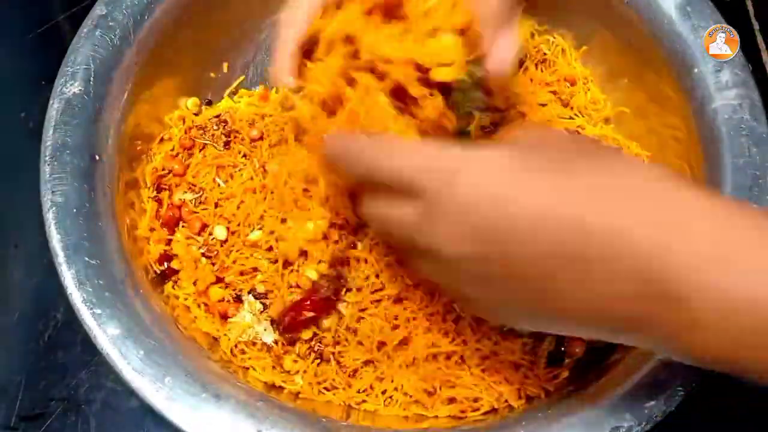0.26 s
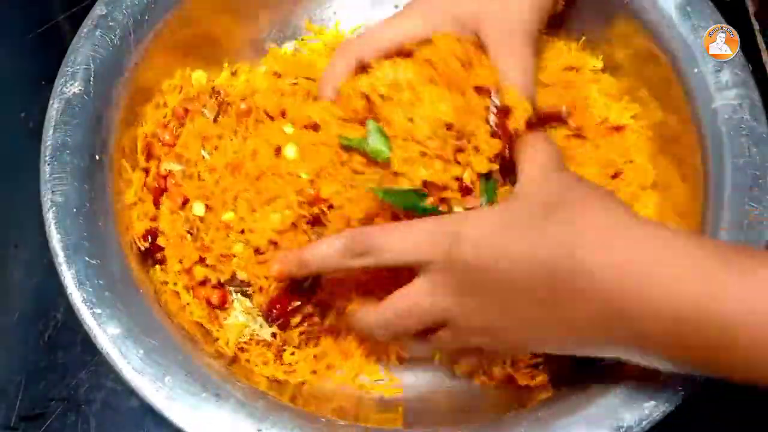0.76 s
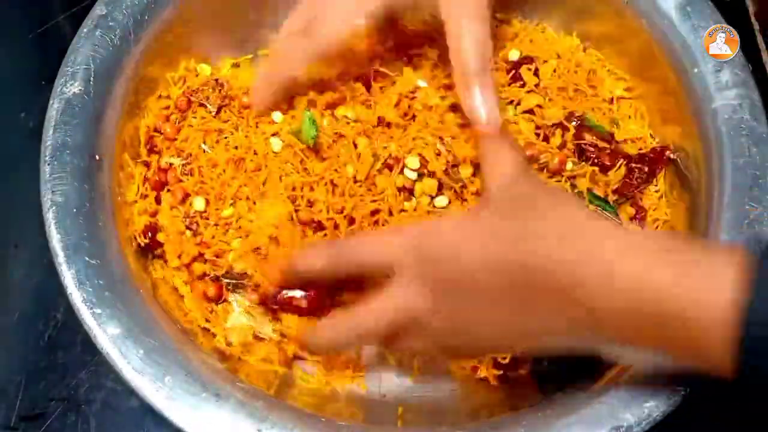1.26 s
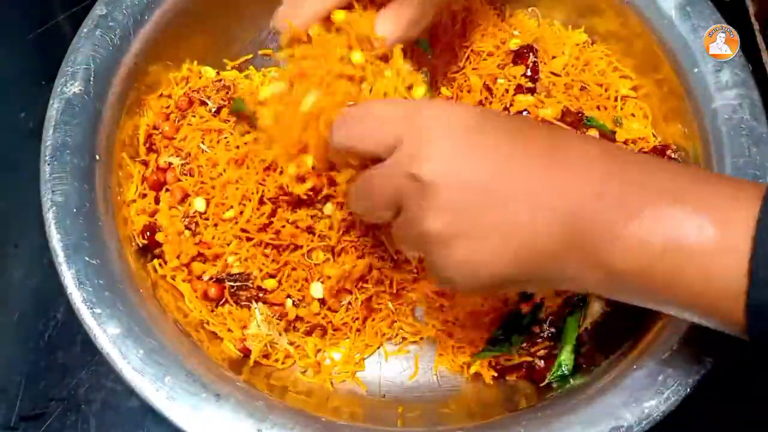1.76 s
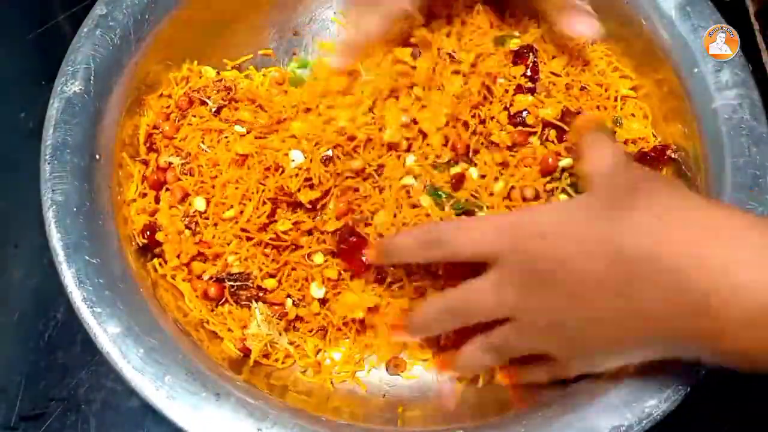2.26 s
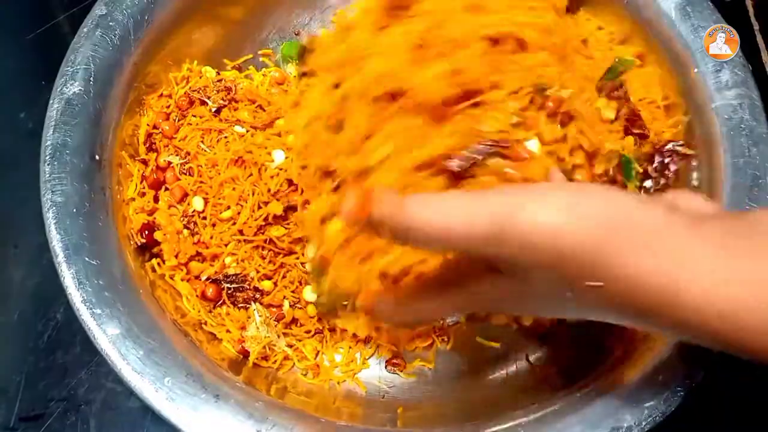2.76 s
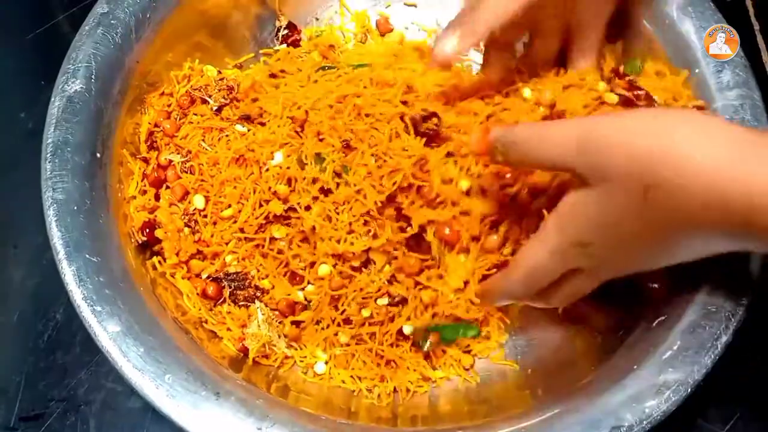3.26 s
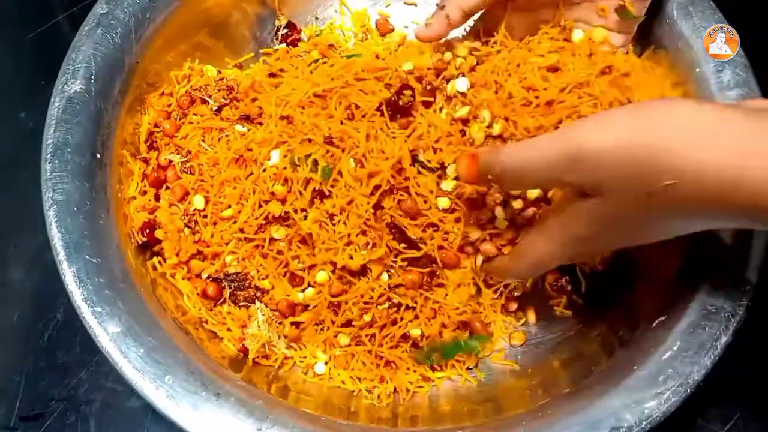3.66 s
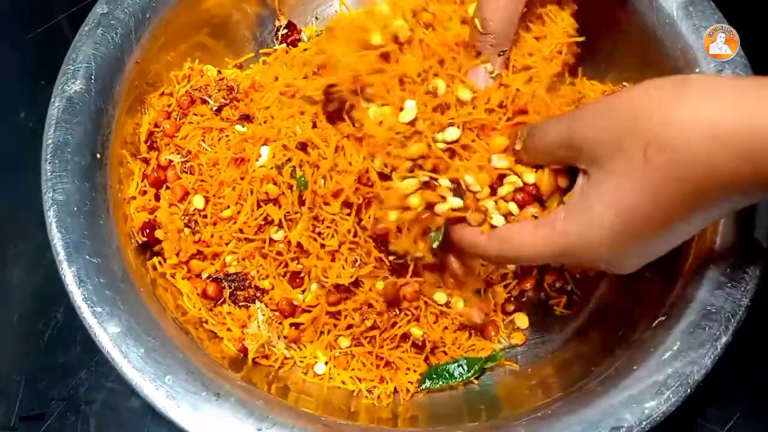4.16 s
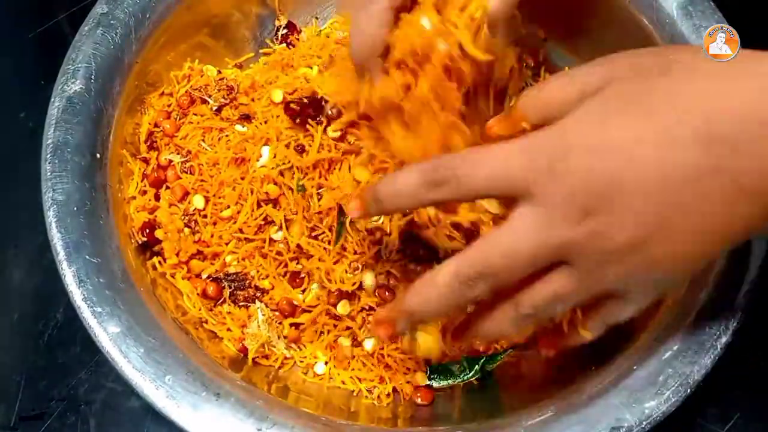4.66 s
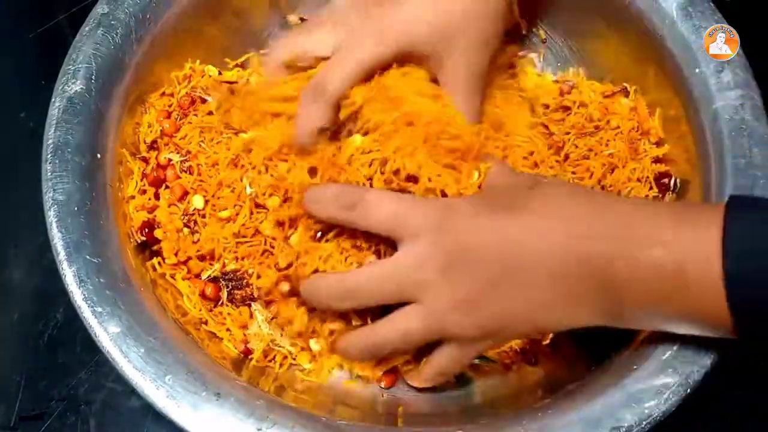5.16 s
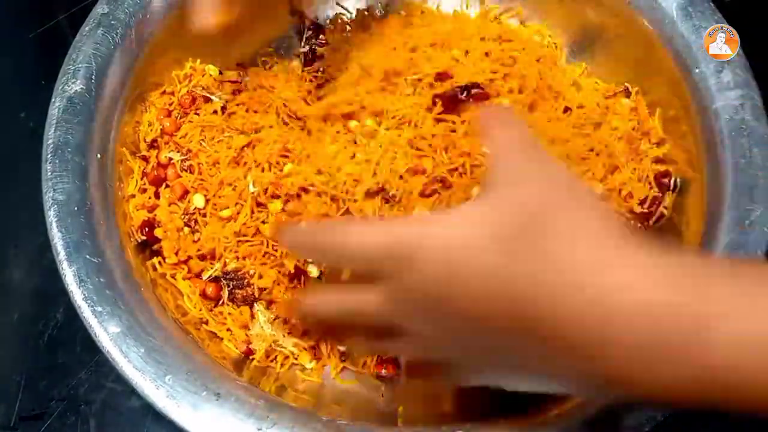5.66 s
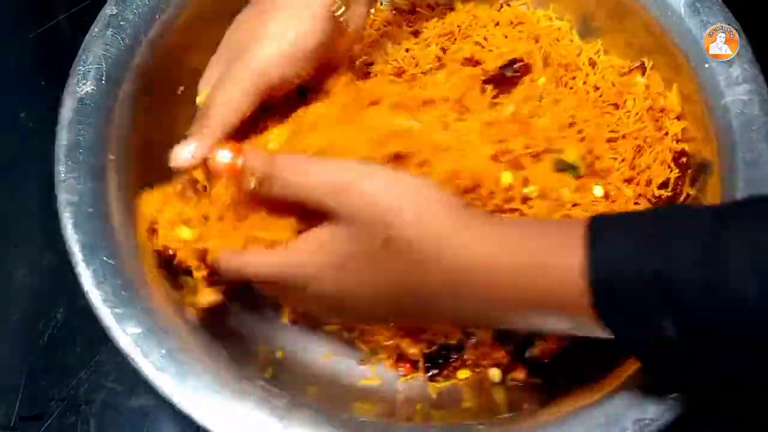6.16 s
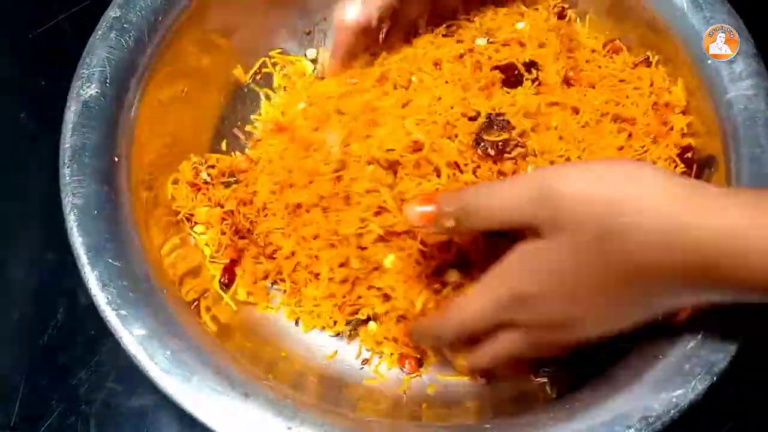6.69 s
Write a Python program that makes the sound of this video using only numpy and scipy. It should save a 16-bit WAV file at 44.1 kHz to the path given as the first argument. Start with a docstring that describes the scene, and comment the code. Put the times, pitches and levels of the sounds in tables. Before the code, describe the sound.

From the start, hands toss dry fried noodles, nuts and lentils in a wide steel bowl, close to the microphone. Countless brittle pieces click together in a crisp rustle that swells unevenly with each grab and sweep, while the sliding heap adds a hollow, low rumble from the bowl on the counter. Single strands snap and nuts drop throughout, with a dense rattle around 1.5 to 1.8 seconds. The sharp clicks are thickest from about 2.6 to 4.2 seconds. A few dull knocks on the bowl's floor fall between 3 and 5.3 seconds, the first the clearest. At about 5.3 seconds, pieces briefly scrape bare steel and a finger squeaks faintly. A second scrape at 6.2 seconds leads into two flung handfuls around 6.5 and 6.6 seconds, each cracking against the wall with a short metallic ring. A few last nuts drop amid the rustling just before 7 seconds.

```python
"""Two hands toss dry fried noodles, nuts and lentils in a wide steel bowl, close to a two-port microphone.
Fingers dig in, thousands of brittle pieces click together, and the sliding heap rumbles the bowl on the
counter. Snapping strands and dropping nuts stand out, thickest midway, joined by dull knocks on the floor
of the bowl. After five seconds pieces scrape bare steel and a finger squeaks. Near the end a second scrape
leads into two flung handfuls that ring the wall, and a few last nuts drop."""
import sys
import numpy as np
from scipy import signal
from scipy.fft import rfft, irfft
from scipy.io import wavfile

SR = 44100
rng = np.random.default_rng(int(sys.argv[2]) if len(sys.argv) > 2 else 0)


def transcribe(u):
    """Save the signal u as a 16-bit wav file named by the first command-line argument.

    u: samples, shape (n,) or (channels, n), limited to [-1, 1]; the rate is SR.
    q: integer samples, one column per channel.
    """
    v = np.clip(np.atleast_2d(u).T, -1, 1)
    q = np.round(v * 32767).astype(np.int16)
    wavfile.write(sys.argv[1], SR, q)


N = 305613
T = np.arange(N) / SR

# The crisp colour of the noodle strands. Each row: frequency in Hz, level in dB.
STRAND_COLOUR = [(1760, -30), (3000, 0), (3420, -2.5), (3980, 1), (4950, -3), (6080, -3.5), (8500, -23.5),
                 (11000, -51.5), (18700, -120)]
# The bright fizz of the crumbs. Each row: frequency in Hz, level in dB.
CRUMB_COLOUR = [(4120, -20.5), (7000, 1), (9810, -9.5), (12600, -6), (13600, -7), (15000, -0.5),
                (15800, -40)]
# The colour that the air in the bowl gives the nuts. Each row: frequency in Hz, level in dB.
NUT_COLOUR = [(1000, -33.5), (1500, -14.5), (1900, -6), (2300, -1.5), (2650, 0), (3000, -1.5), (3600, -17),
              (6000, -51.5)]


def heap(gains):
    """Clumped clicks over a blur of countless smaller ones: strands, nuts, crumbs, body and rumble."""
    # Narrow rings of the air in the bowl. Each row: pitch in Hz, width in Hz, level in dB.
    air_modes = [(2300, 47, -8.5), (2465, 36, 3.5), (2690, 52, 3.5)]
    # The hollow body of the bowl. Each row: frequency in Hz, level in dB.
    hollow_colour = [(100, -46.5), (170, -9), (307, -6.5), (598, -7.5), (724, -1.5), (860, -3.5),
                     (969, 3.5), (1330, -11), (1500, -6.5), (1950, -24), (3300, -120)]
    grains = clicks(per_s=2500, spread_db=2.88, t60=0.053, q=3.27, broad=0.16)
    breaks = clicks(per_s=220, spread_db=3.8, t60=0.015, q=1.1, broad=0.59, pitches=5)  # single strands
    taps = clicks(per_s=90, spread_db=3.7, t60=0.016, q=2.0, broad=1.6, pitches=4)  # single nuts landing
    strands = colour((0.54 * breaks + grains + 0.43 * stereo_noise(0.028)) * flutter(12.4, 1.78),
                     STRAND_COLOUR)
    nuts = colour((0.4 * taps + grains + 0.49 * stereo_noise(0.43)) * flutter(9.5, 1.78), NUT_COLOUR)
    air_ring = sum(amp(db) * resonate(nuts, hz, width) for hz, width, db in air_modes)
    nuts = unit_rms(nuts) + amp(-12) * unit_rms(air_ring)
    crumbs = colour((0.3 * breaks + grains + 1.1 * stereo_noise(0.1)) * flutter(11, 2.4), CRUMB_COLOUR)
    hollow = colour((0.55 * grains + stereo_noise(0.8)) * flutter(9, 2.2), hollow_colour)
    layers = (strands, nuts, crumbs, hollow, rumble())
    return sum(gain * unit_rms(layer) for gain, layer in zip(gains, layers))


def hands():
    """The hands ride the gains of the heap's five layers; overlapping gestures add in power."""
    # The heap settling. In order: levels in dB of strands, nuts, crumbs, hollow body and rumble.
    settling = (-42, -41, -53, -51, -55)
    # Fingers digging in. Each row: peak time, rise and fall in seconds, then strands, nuts, crumbs in dB.
    grabs = [(0.15, 0.21, 0.02, -45, -28.5, -39), (0.452, 0.013, 0.07, -22, -23.5, -49),
             (0.79, 0.12, 0.18, -24, -28, -32), (0.92, 0.084, 0.35, -22.5, -28.5, -33.5),
             (1.56, 0.14, 0.11, -19, -20.5, -28.5), (1.66, 0.04, 0.32, -25, -18.5, -35),
             (2.05, 0.96, 0.56, -28.5, -31.5, -35.5), (2.3, 0.1, 0.27, -29.5, -29.5, -35),
             (2.711, 0.037, 0.69, -21.5, -23, -35), (3.25, 0.26, 0.23, -28.5, -24, -39),
             (3.5, 0.21, 0.45, -26, -27.5, -35), (3.87, 0.016, 0.44, -32.5, -24, -38),
             (4.08, 0.39, 0.19, -27, -67, -57), (4.7, 0.09, 0.083, -28, -38, -38),
             (4.95, 0.74, 0.51, -28, -33, -42), (5.14, 0.07, 1.9, -28.5, -30.5, -40.5),
             (5.958, 0.16, 1.4, -24, -29, -33), (6.52, 0.16, 0.37, -18, -16, -34),
             (6.83, 0.4, 0.47, -25.5, -39, -34)]
    # The heap sliding over the steel. Each row: peak time, rise and fall in seconds,
    # then strands, nuts, hollow body and rumble in dB.
    sweeps = [(0.33, 0.44, 0.27, -25, -25, -31.5, -37.5), (1.06, 0.26, 0.21, -27.5, -19.5, -31, -38),
              (1.821, 0.16, 0.15, -27.5, -22, -28, -31), (2.84, 0.23, 0.36, -44, -22.5, -34.5, -42.5),
              (3.64, 0.34, 0.12, -23.5, -19.5, -39.5, -43.5), (5.548, 0.22, 0.23, -22.5, -19, -28, -34.5),
              (6.285, 0.14, 0.19, -21.5, -20.5, -34, -31)]
    power = amp(settling)[:, None] ** 2 * np.ones(N)
    for peak, rise, fall, strands, nuts, crumbs in grabs:
        hollow = (strands + nuts) / 2 - 15
        swell_db = gesture(peak, rise, fall, rise_bend=0.91, fall_bend=0.9)  # peaks sharply
        power[:4] += amp(np.c_[[strands, nuts, crumbs, hollow]] + swell_db) ** 2
    for peak, rise, fall, strands, nuts, hollow, rocking in sweeps:
        crumbs = strands - 11
        swell_db = gesture(peak, rise, fall, rise_bend=1.1, fall_bend=1.55)  # holds, then stops short
        power += amp(np.c_[[strands, nuts, crumbs, hollow, rocking]] + swell_db) ** 2
    return np.sqrt(power)


def gesture(peak, rise, fall, rise_bend, fall_bend):
    """One hand move in dB: it swells from -15 to 0 over the rise and sinks back over the fall."""
    away = abs(T - peak)
    return -15 * np.where(T < peak, (away / rise) ** rise_bend, (away / fall) ** fall_bend)


def snaps():
    """A nut drops or a strand snaps: a few milliseconds of crack, then a weaker scatter in the bowl."""
    # Each row: start in seconds, peak level in dB, pitch in Hz.
    pieces = [(0.17, -12.5, 6100), (0.191, -14.5, 5830), (0.3492, -9, 3900), (0.4615, -9.5, 3920),
              (0.6315, -8.5, 4220), (0.814, -18, 2340), (0.835, -7.5, 2330), (0.863, -21, 2520),
              (2.0362, -11, 5660), (2.155, -20, 2300), (2.238, -24, 2400), (2.2583, -26, 4640),
              (2.61, -19.5, 2600), (2.641, -26, 4350), (2.6716, -12.5, 2610), (2.6962, -9, 2620),
              (2.7822, -3.5, 2300), (2.8885, -24, 2580), (3.0526, -14, 2360), (3.109, -11.5, 2960),
              (3.211, -33, 2780), (3.2286, -6, 2530), (3.2817, -4.5, 2520), (3.4105, -24, 2540),
              (3.4677, -11, 2720), (3.484, -6.5, 2300), (3.507, -6, 2440), (3.5167, -5.5, 2370),
              (3.5253, -10, 3900), (3.753, -11, 2690), (3.8258, -5, 2600), (3.852, -2, 2590),
              (3.8896, -11.5, 2610), (3.9934, -12.5, 2630), (4.0617, -4, 2530), (4.1135, -15, 2650),
              (4.1563, -12, 2590), (4.1878, -23.5, 2580), (4.2263, -18, 2580), (4.389, -16, 2580),
              (4.475, -28, 2230), (4.681, -17, 2560), (4.7232, -17.5, 2600), (4.8728, -16, 2130),
              (4.894, -18.5, 4450), (4.9347, -29, 3670), (4.963, -20, 2930), (5.0459, -18, 2260),
              (5.093, -15, 4200), (5.1186, -12.5, 4940), (5.218, -19, 6400), (5.389, -13.5, 2740),
              (5.658, -17, 4100), (5.694, -11, 2650), (5.773, -13, 2800), (5.882, -18, 3700),
              (5.948, -13, 6150), (6.019, -15, 2700), (6.0651, -9, 2610), (6.096, -6.5, 5650),
              (6.7706, -11.5, 2550), (6.839, -9.5, 2620), (6.877, -12.5, 2670)]
    out, t = np.zeros((2, N)), np.arange(3000) / SR
    envelope = (decay(t, 0.011) + amp(-15.5) * decay(t, 0.1)) * np.minimum(t / 0.0006, 1)
    for start, db, hz in pieces:
        edge_db = -19.5 + 10.5 * np.log2(hz / 2600)  # smaller, higher pieces are brighter
        crack = burst(hz, envelope, width_hz=430 * hz / 2600, crack_db=-12.5, edge_db=edge_db)
        add(out, start, amp(db) * crack / abs(crack.mean(0)).max())
    return out


def nut_clusters():
    """Several nuts land at once in a short, dense rattle."""
    # Each row: start in seconds, peak level in dB, pitch in Hz, hold in seconds.
    landings = [(0.28, -15.5, 2400, 0.025), (0.98, -11.5, 2530, 0.024), (1.529, -6, 2380, 0.0061),
                (1.556, -4.5, 2675, 0.017), (1.603, -12, 2620, 0.015), (1.638, -13, 2700, 0.028),
                (1.806, -10.5, 2660, 0.018), (2.596, -21, 2514, 0.007), (4.688, -22, 2540, 0.013)]
    out, t = np.zeros((2, N)), np.arange(3000) / SR
    for start, db, hz, hold in landings:
        envelope = decay(t - hold, 0.058) * np.minimum(t / 0.0038, 1)
        rattle = burst(hz, envelope, width_hz=340, crack_db=-12.5, edge_db=-20.5)
        add(out, start, amp(db) * rattle / abs(rattle.mean(0)).max())
    return out


def flings():
    """A handful strikes the wall: a long crack that also rings the steel."""
    # Each row: start in seconds, crack level in dB, pitch in Hz, hold and 60 dB decay in seconds,
    # spot struck on the wall, which sets which steel tones ring loudest.
    handfuls = [(6.486, -12.5, 2800, 0.031, 0.18, 0.1), (6.61, -10, 4400, 0.0036, 0.095, 0.5)]
    out, t = np.zeros((2, N)), np.arange(SR // 3) / SR
    for start, db, hz, hold, t60, spot in handfuls:
        envelope = decay(t - hold, t60) * np.minimum(t / 0.0029, 1)
        crack = burst(hz, envelope, width_hz=540, crack_db=-4, edge_db=-26)
        ring = unit_rms(steel_wall(rng.standard_normal((2, len(t))) * envelope, spot))
        attack_rms = np.sqrt(np.mean(crack[:, :SR // 50] ** 2))
        add(out, start, amp(db) * (crack + amp(2.5) * ring) / attack_rms)
    return out


def scrapes(strand_gain):
    """Rough contact keeps the wall ringing: faintly under all stirring, clearly where steel is bare."""
    # Pieces dragged along bare steel. Each row: start and end in seconds, level in dB.
    drags = [(5.233, 5.412, -24.5), (6.178, 6.482, -24)]
    bare = sum(amp(db) * gate(start, end, fade=0.055) for start, end, db in drags)
    slide = sum(0.73 * (T - start) * (start < T) * (T < end) for start, end, _ in drags)
    spot = (0.11 + slide) * flutter(12, 6.3)  # the contact wanders, so the modes come and go
    friction = stereo_noise(0.11) * flutter(37, 1.8)
    return (bare + amp(-20.5) * strand_gain) * unit_rms(steel_wall(friction, spot))


def steel_wall(drive, spot):
    """The wall of the bowl rings; the spot of contact favours some modes over their neighbours."""
    # Each row: pitch in Hz, width in Hz, level in dB.
    modes = [(735, 23, -5), (976, 42, -9), (1136, 12, -4.5), (1604, 14, 4), (2230, 43, 4.5),
             (3160, 28, -0.5), (3400, 22, 2), (3900, 33, 5), (4220, 37, -0.5), (4560, 5.7, 5.5),
             (5290, 20, 4.5), (5950, 30, 0)]
    reach = 0.12 + np.cos(np.pi * (np.arange(len(modes))[:, None] / 4 - spot)) ** 2
    return sum(gain * amp(db) * resonate(drive, hz, width) for gain, (hz, width, db) in zip(reach, modes))


def knocks():
    """Knuckles and nuts hit the floor of the bowl: a tick and a dull, rough ring, alike at both ports."""
    # Each row: start in seconds, peak level in dB, pitch in Hz.
    blows = [(3.064, -16, 950), (3.669, -29, 704), (3.868, -21, 560), (4.722, -31.5, 1000),
             (5.332, -25, 790)]
    out, t = np.zeros((2, N)), np.arange(3000) / SR
    envelope = decay(t, 0.055) + amp(-3) * decay(t, 0.16)
    for start, db, hz in blows:
        centre, side = rng.standard_normal((2, len(t))) * envelope
        blow = np.array([centre, centre + 0.68 * side])
        ring = unit_rms(resonate(resonate(blow, hz, 210), hz, 570))
        knock = ring + amp(-13) * unit_rms(colour(blow, NUT_COLOUR))
        add(out, start, amp(db) * knock / abs(knock).max())
    return out


def squeak():
    """A finger squeaks on the steel: an unsteady tone that rises a little."""
    # In order: start and end in seconds, first and last pitch in Hz, level in dB.
    start, end, first_hz, last_hz, db = (5.265, 5.375, 742, 770, -39)
    pitch = np.interp(T, [start, end], [first_hz, last_hz]) * flutter(25, 0.06)
    tone = np.sqrt(2) * np.sin(2 * np.pi * np.cumsum(pitch) / SR)
    return amp(db) * gate(start, end, fade=0.0091) * flutter(25, 3.8) * tone


def rumble():
    """The sliding heap rocks the bowl on the counter."""
    # Each row: pitch in Hz, width in Hz, level in dB.
    modes = [(83.8, 20, -3.5), (98.7, 21.7, -4), (138, 7.5, -1.5)]
    push = stereo_noise(0.99) * flutter(14, 2.9)
    return sum(amp(db) * resonate(resonate(push, hz, width), hz, 2 * width) for hz, width, db in modes)


def clicks(per_s, spread_db, t60, q, broad, pitches=14):
    """Pieces of many pitches collide at random; each click scatters differently towards each port."""
    hits = amp(spread_db * np.minimum(rng.exponential(1, N), 5)) * (rng.random(N) < per_s / SR)
    piece = rng.integers(0, pitches, N)
    out, t = np.zeros((2, N)), np.arange(1200) / SR
    for k, hz in enumerate(np.geomspace(500, 15000, pitches)):
        scatter = rng.standard_normal((2, len(t))) * decay(t, t60)
        grain = broad * scatter + resonate(resonate(scatter, hz, hz / q), hz, hz / q)
        out += signal.oaconvolve((hits * (piece == k))[None], grain, axes=1)[:, :N]
    return unit_rms(out)


def burst(hz, envelope, width_hz, crack_db, edge_db):
    """A puff of impacts led by one hard tick: the pitch of the piece, a broad crack and a bright edge."""
    puff = rng.standard_normal((2, len(envelope))) * envelope
    puff[:, 0] = 1.5  # the tick
    pitched = unit_rms(resonate(resonate(puff, hz, width_hz), hz, 2 * width_hz))
    crack = amp(crack_db) * unit_rms(colour(puff, STRAND_COLOUR))
    edge = amp(edge_db) * unit_rms(colour(puff, CRUMB_COLOUR))
    return pitched + crack + edge


def colour(x, points):
    """Causal EQ with the given curve, so that clicks keep their sharp attack."""
    curve_db = read_curve(points, abs(np.fft.fftfreq(4096, 1 / SR)))
    log_gain = np.log(amp(np.maximum(curve_db, -80)))
    minimum_phase = np.exp(np.conj(signal.hilbert(log_gain)))
    taps = np.fft.ifft(minimum_phase).real[:2048]
    return signal.oaconvolve(x, taps[None], axes=1)[:, :x.shape[1]]


def resonate(x, hz, width_hz):
    """A two-pole resonance."""
    r = np.exp(-np.pi * width_hz / SR)
    c = r * np.cos(2 * np.pi * hz / SR)
    return 2 * (1 - r) * signal.lfilter([1, -c], [1, -2 * c, r * r], x)


def stereo_noise(correlation):
    """White noise at both ports: wide at 0, mono at 1."""
    left, other = rng.standard_normal((2, N))
    return np.array([left, correlation * left + np.sqrt(1 - correlation ** 2) * other])


def flutter(width_hz, depth_db):
    """A factor that wanders at random around 1."""
    return amp(depth_db * unit_rms(resonate(rng.standard_normal(N), 0, width_hz)))


def decay(t, t60):
    """Full level until t = 0, then down 60 dB every t60 seconds."""
    return amp(-60 * np.maximum(t, 0) / t60)


def gate(start, end, fade):
    return np.clip(np.minimum(T - start, end - T) / fade, 0, 1)


def read_curve(points, hz):
    point_hz, db = np.transpose(points)
    return np.interp(np.log(hz + 1), np.log(point_hz + 1), db)


def add(mix, start, sound):
    part = mix[:, round(start * SR):][:, :sound.shape[1]]
    part += sound[:, :part.shape[1]]


def amp(db):
    return 10 ** (np.asarray(db) / 20)


def unit_rms(x):
    return x / np.sqrt(np.mean(x ** 2) + 1e-20)


def scene():
    """The whole bowl, drifting slightly from right to left as the hands work across it."""
    gains = hands()
    bowl = heap(gains) + scrapes(gains[0]) + snaps() + nut_clusters() + knocks() + squeak() + flings()
    pan_db = np.linspace(-1, 0.55, N) / 2
    return bowl * amp([pan_db, -pan_db])


def record(dry):
    """The two ports differ in colour; loud peaks clip; the very top is cut and a small offset added."""
    # Each row: frequency in Hz, left minus right in dB.
    port_balance = [(60, -5.5), (120, -2), (240, 2.5), (480, -1), (950, -0.5), (1890, -3.5), (3770, -11),
                    (7520, -0.5), (15000, 0)]
    tilt_db = read_curve(port_balance, np.fft.rfftfreq(N, 1 / SR)) / 2
    ports = irfft(rfft(dry) * amp([tilt_db, -tilt_db]), N)
    clipped = np.clip(ports, -0.97, 0.97)
    lowpass = signal.firwin(511, cutoff=15850, window=("kaiser", 9), fs=SR)
    return signal.oaconvolve(clipped, lowpass[None], "same") + 0.003


dry = scene()
out = record(dry)
transcribe(out)
```